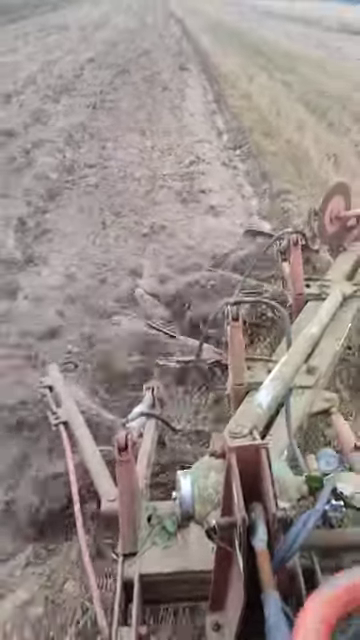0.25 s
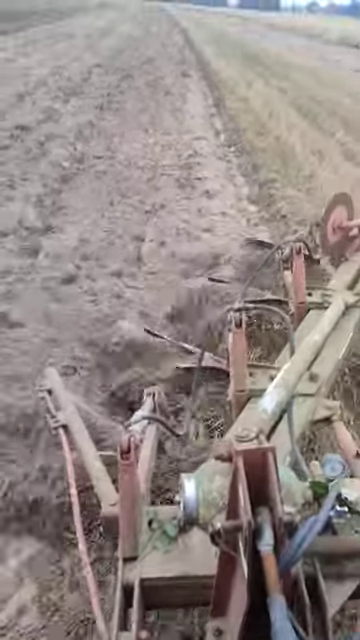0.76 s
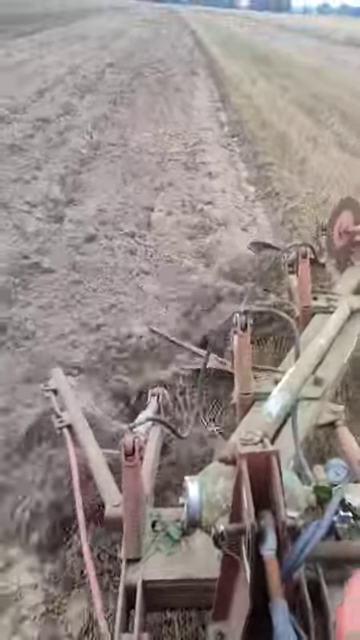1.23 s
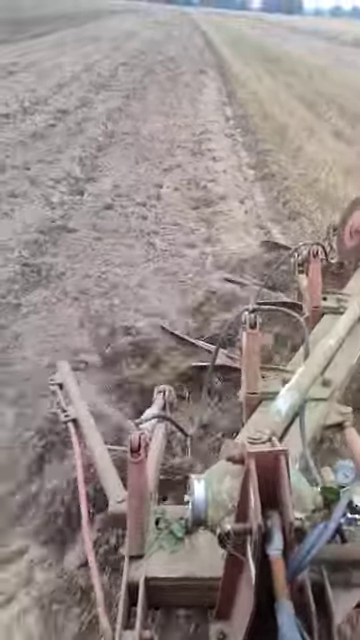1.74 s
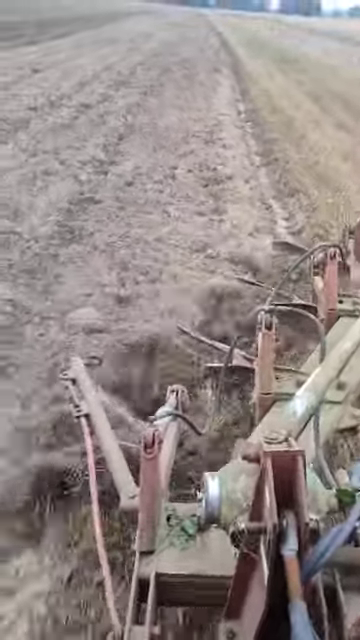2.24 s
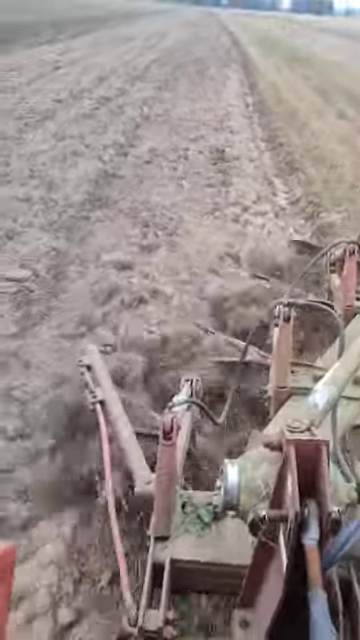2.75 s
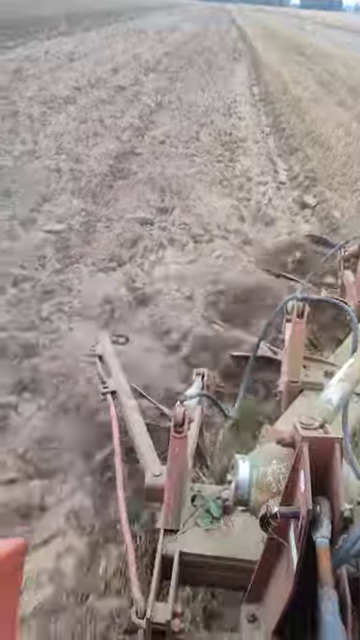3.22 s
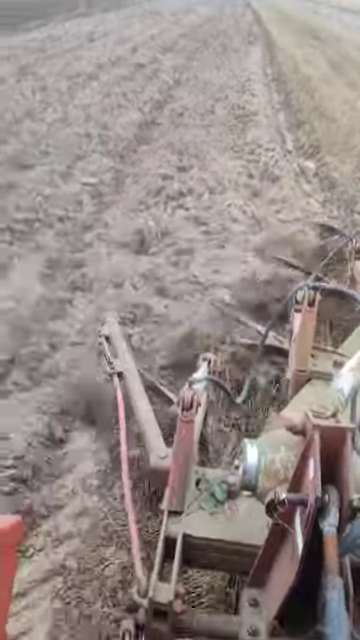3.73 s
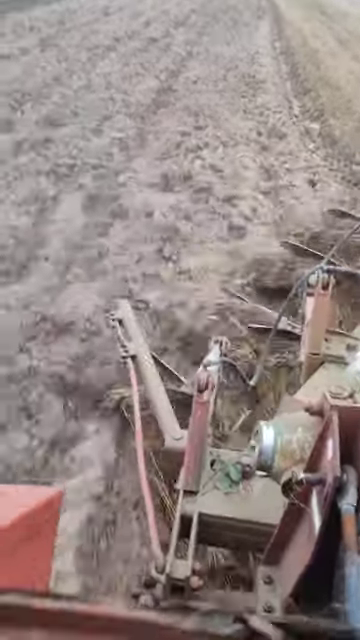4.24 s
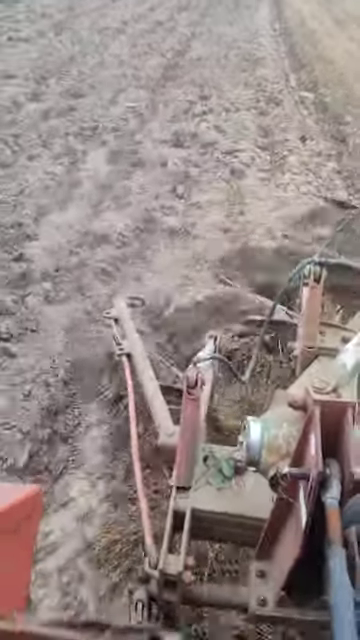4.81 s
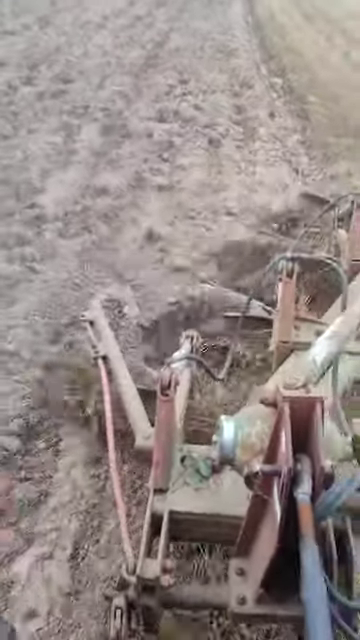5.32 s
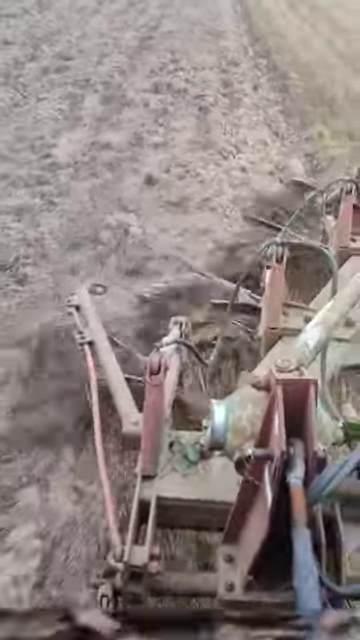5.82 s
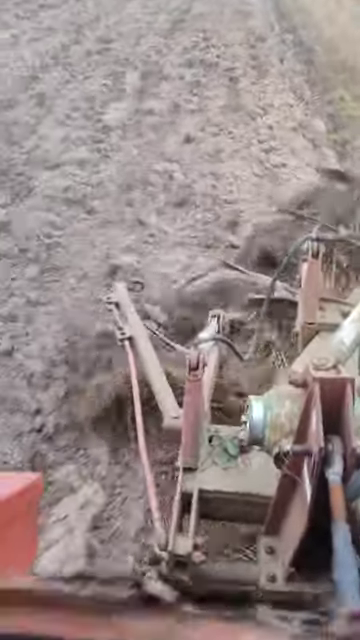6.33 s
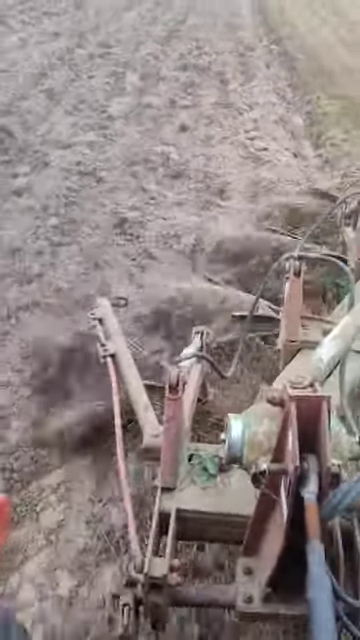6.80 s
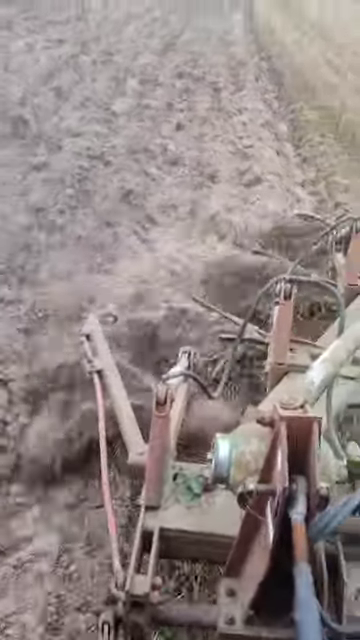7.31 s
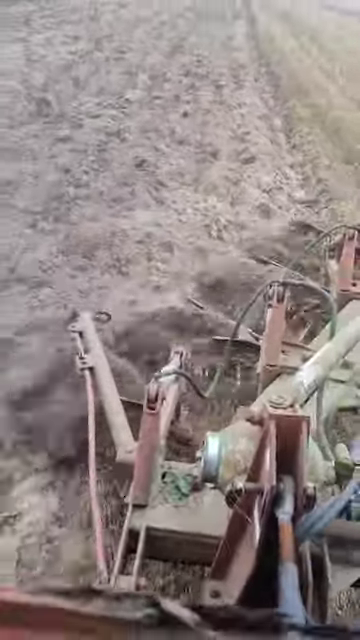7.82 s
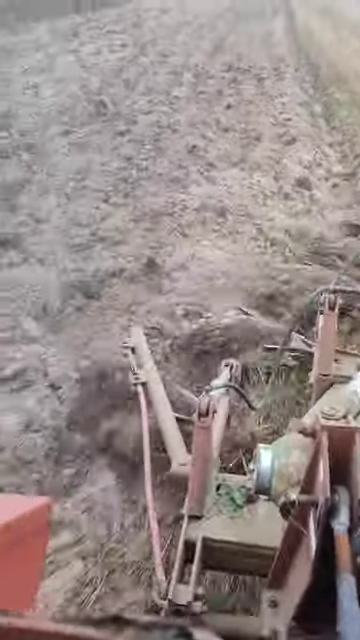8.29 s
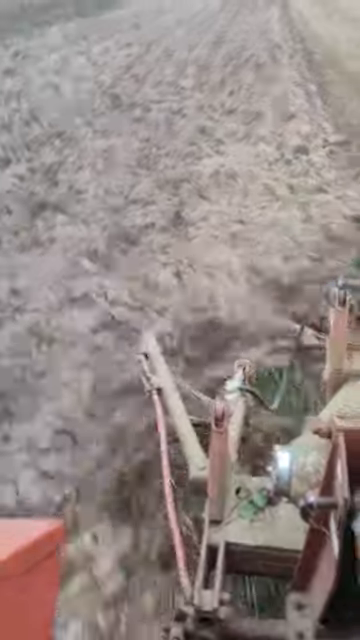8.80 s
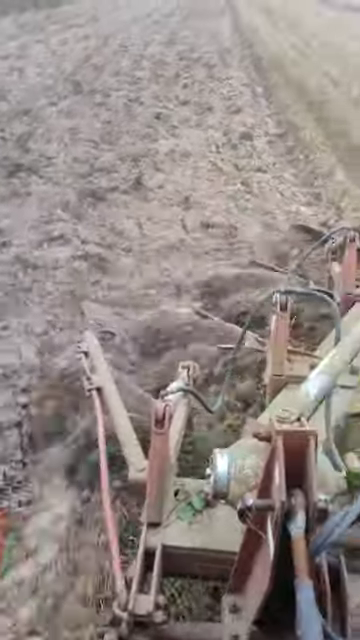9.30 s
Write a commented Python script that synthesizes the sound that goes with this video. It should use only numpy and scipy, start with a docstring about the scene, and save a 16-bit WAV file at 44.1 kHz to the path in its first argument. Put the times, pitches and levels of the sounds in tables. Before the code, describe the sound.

Heavy, continuous tractor engine growl and whirring gears, heard at the open cab rear, over rushing torn soil, crackling crumbs and ticking stones.

```python
"""A diesel drone with a swelling cab boom comes first: a six-cylinder tractor pulls a harrow through dry soil.
Heard from the open back of the cab; fan, gear pump, gears and shafts are drifting sines locked to the crank.
Valve clatter is a repeated noise pattern; low rumbles, the roar of soil and engine, and spray are shaped noise.
Crumbs are damped rings, and grit ticks on steel as short band-limited scrapes.
An automatic gain control ducks everything when the boom swells."""
import sys
import numpy as np
from scipy import signal
from scipy.fft import rfft, irfft, next_fast_len
from scipy.io import wavfile
from scipy.ndimage import uniform_filter1d

SR = 44100
rng = np.random.default_rng(int(sys.argv[2]) if len(sys.argv) > 2 else 0)


def generate_wav(sig):
    """Save sig (samples, or channels by samples) to the path in sys.argv[1] as 16-bit PCM at SR."""
    pcm = np.round(np.clip(np.atleast_2d(sig).T, -1, 1) * 32767).astype(np.int16)
    wavfile.write(sys.argv[1], SR, pcm)


N = 421155


def amp(db):
    """Amplitude ratio of a level in dB."""
    return 10 ** (np.asarray(db) / 20)


def unit(x):
    """Scale to rms 1."""
    return x / np.sqrt(np.mean(x ** 2) + 1e-20)


def along(points, hz):
    """Interpolate (Hz, value) points on a log-frequency axis."""
    point_hz, value = np.transpose(points)
    return np.interp(np.log(hz + 1), np.log(point_hz + 1), value)


def curves(rows):
    """One value per sample for each column after the time in s."""
    time_s, *columns = np.transpose(rows)
    return [np.interp(np.arange(N) / SR, time_s, column) for column in columns]


def wobble(rate_hz):
    """Random curve through rate_hz normal-distributed knots a second."""
    knots = rng.standard_normal(int(N * rate_hz / SR) + 2)
    return np.interp(np.arange(N) * rate_hz / SR, np.arange(len(knots)), knots)


def filtered(x, response):
    """Apply a complex response of frequency to x."""
    padded = next_fast_len(N + SR // 2)
    spectrum = rfft(x, padded) * response(np.fft.rfftfreq(padded, 1 / SR))
    return irfft(spectrum, padded)[..., :N]


def panned(lean_db):
    """Left and right gains for a left-minus-right level."""
    return amp(np.multiply.outer([.5, -.5], lean_db))


def tone(angle, db, lean_db, flutter_db, wander_rad):
    """A sine of rms db whose level and phase drift at random."""
    level = amp(db + flutter_db * (wobble(5) + .4 * wobble(16)))
    wave = level * np.sqrt(2) * np.cos(angle + wander_rad * wobble(4))
    return panned(lean_db)[:, None] * wave


# engine speed, creeping up as the soil eases: time_s, firing_hz
SPEED = [(0, 121.8), (.45, 121.4), (.7, 121.85), (.92, 120.65), (1.25, 120.75), (1.5, 121.1), (1.9, 120.7),
         (2.15, 121.0), (2.4, 121.3), (3.3, 122.9), (3.55, 122.95), (4.05, 124.2), (4.4, 123.3),
         (5.0, 123.2), (5.27, 122.6), (5.5, 123.35), (5.9, 123.6), (6.3, 123.45), (6.55, 124.05),
         (6.75, 124.1), (6.95, 124.7), (7.3, 124.3), (7.7, 124.6), (7.95, 124.15), (8.2, 124.7),
         (8.7, 124.55), (8.95, 124.2), (9.15, 124.6), (9.4, 124.0), (9.55, 124.15)]


def crank():
    """Firing rate and four-stroke cycle angle; six firings a cycle."""
    firing_hz = curves(SPEED)[0]
    return firing_hz, 2 * np.pi * np.cumsum(firing_hz) / (6 * SR)


# crank-turn boom level: time_s, level_db
BOOM_LEVEL = [(0, -35), (.25, -36.5), (.4, -24.5), (.9, -38), (1.4, -29), (1.85, -24.5), (2.38, -35),
              (2.55, -14.5), (2.95, -32), (3.2, -22.5), (4.0, -22.5), (4.27, -12), (4.42, -30.5),
              (4.65, -19), (4.8, -20.5), (5.28, -23.5), (5.55, -30.5), (5.8, -21), (6.55, -23),
              (6.93, -17.5), (7.16, -22.5), (7.4, -22.5), (7.6, -27.5), (8.05, -20), (8.4, -25.5),
              (8.78, -14.5), (9.05, -24.5), (9.3, -18), (9.55, -29.5)]


def boom(cycle):
    """The cab booms at the crank rate, two turns a cycle."""
    return tone(2 * cycle - 1, curves(BOOM_LEVEL)[0], -2.5, flutter_db=1.6, wander_rad=0.39)


# engine orders: cycle_multiple (rounded in use), slow_db, middle_db, fast_db, lean_db (left minus right)
ORDERS = [(3, -29, -28, -29, -2), (6, -22, -23, -22.5, -1), (7, -31.5, -29.5, -29, -3.5),
          (9, -31.5, -28.5, -29, -4), (11, -45.5, -46.5, -48.5, -0.5), (12, -30, -30, -31.5, -5.5),
          (14, -39, -31, -35.5, -5), (16, -34, -32.5, -32, 1.5), (17, -31, -36.5, -32.5, -7),
          (18, -41, -36.5, -38, -4.5), (19, -38, -35, -50, -6.5), (20, -38, -39.5, -41.5, -5.5),
          (21, -38.5, -41.5, -39.5, 2.5), (22, -39, -39.5, -38, -2), (24, -41, -38.5, -36, -7.5),
          (26, -38.5, -37, -55.5, -4.5), (32, -41, -38.5, -47, -10), (35, -53, -37, -47.5, 0.5),
          (36, -47.5, -45.5, -43, -4), (40, -52, -44, -44.5, -1), (44, -40, -44, -43, -2),
          (45, -44.5, -51.5, -44, -3.5), (46, -44.5, -61.5, -52, 0.5), (48, -40.5, -41.5, -42, -8),
          (51, -39.5, -42.5, -45, -1.5), (55, -55, -43.5, -47, -7.5), (57, -43.5, -51.5, -42.5, -9),
          (60, -45, -52.5, -50.5, -1.5), (61, -43, -50.5, -49.5, -5), (68.2, -38.5, -54, -46.5, -8.5),
          (78.2, -49, -50.5, -49.5, 2)]
# firing_hz at slow, middle, fast
SPEEDS_HZ = [121.2, 123.3, 124.6]


def engine_orders(firing_hz, cycle):
    """Multiples of the cycle; cab resonances favour different ones as the speed moves."""
    out = np.zeros((2, N))
    for multiple, slow_db, middle_db, fast_db, lean_db in ORDERS:
        multiple = round(multiple)
        start_rad = rng.uniform(0, 2 * np.pi)
        loose = min(0.25 + multiple / 40, 1)  # high multiples are less steady
        if multiple in (3, 6, 9):
            start_rad = 0  # exhaust puffs keep step
            loose *= 0.41  # and are steadier than their neighbours
        db = np.interp(firing_hz, SPEEDS_HZ, [slow_db, middle_db, fast_db])
        out += tone(multiple * cycle + start_rad, db, lean_db, flutter_db=2.4 * loose, wander_rad=0.76 * loose)
    return out


# swelling orders: cycle_multiple, lean_db (left minus right)
SWELLING_ORDERS = [(10, -5), (25, 0.5), (39, 0.5)]
# their levels: time_s, then level_db of each order
SWELL_LEVELS = [(0, -31.5, -38.5, -44), (.75, -34, -34, -47), (1.5, -29.5, -36, -40),
                (2.5, -27.5, -39, -41.5), (3.25, -29, -36.5, -48), (3.75, -28, -39, -46.5),
                (4.25, -34.5, -38, -43), (4.9, -31.5, -34.5, -46), (5.7, -34.5, -33.5, -40),
                (6.3, -35, -36, -41), (7.3, -38.5, -31.5, -40), (7.9, -36, -32, -40.5),
                (8.3, -36, -39.5, -41.5), (9.55, -30, -35, -39.5)]


def swelling_orders(cycle):
    """A few engine orders swell and fade slowly."""
    out = np.zeros((2, N))
    for (multiple, lean_db), db in zip(SWELLING_ORDERS, curves(SWELL_LEVELS)):
        out += tone(round(multiple) * cycle, db, lean_db, flutter_db=2.3, wander_rad=0.6)
    return out


FAN_PER_CYCLE = 7.3
# fan blade level: time_s, level_db
FAN_LEVEL = [(0, -33), (.75, -36.5), (1.5, -29), (2.5, -25.5), (3.25, -26.5), (4, -27.5), (4.75, -26),
             (5.5, -29), (6.6, -30.5), (7.2, -24), (7.8, -24), (8.5, -25.5), (9.55, -32.5)]


def fan(cycle):
    """Blade tone geared to the crank; belt slip lets its phase wander."""
    return tone(FAN_PER_CYCLE * cycle, curves(FAN_LEVEL)[0], -2.3, flutter_db=3.5, wander_rad=1.76)


PUMP_PER_CYCLE = 29.44
PUMP_THIRD_DB, PUMP_FOURTH_DB = -48, -54
SQUEAL_S, SQUEAL_WIDTH_S, SQUEAL_RISE_DB = 3.65, 0.09, 14.5
# first harmonic: level_db at slow, middle, fast
PUMP_FIRST_DB = [-35, -41, -39.5]
# second harmonic, singing and dropping out: time_s, level_db
PUMP_SECOND = [(0, -37), (.3, -40), (1.2, -38.5), (1.5, -43.5), (2.0, -40.5), (2.3, -39), (2.7, -36.5),
               (3.0, -32), (3.5, -32), (4.1, -34.5), (4.4, -44.5), (4.9, -36), (5.05, -42), (5.27, -35),
               (5.9, -35.5), (6.0, -44), (6.2, -31), (6.4, -44.5), (6.6, -30.5), (6.85, -39.5), (7.1, -46),
               (7.55, -43), (7.72, -32), (7.9, -40), (8.2, -33), (8.4, -49.5), (8.6, -43.5), (8.75, -33),
               (9.0, -36.5), (9.22, -30.5), (9.55, -44)]


def gear_pump(firing_hz, cycle):
    """Tooth-mesh tone with four harmonics; the fourth flares once."""
    angle = PUMP_PER_CYCLE * cycle + .35 * wobble(4) + .3 * wobble(11)
    first_db = np.interp(firing_hz, SPEEDS_HZ, PUMP_FIRST_DB)
    flare = np.exp(-((np.arange(N) / SR - SQUEAL_S) / SQUEAL_WIDTH_S) ** 2)
    fourth_db = PUMP_FOURTH_DB + SQUEAL_RISE_DB * flare
    out = tone(angle, first_db, -10.0, flutter_db=1.0, wander_rad=0)
    out += tone(2 * angle, curves(PUMP_SECOND)[0], -0.93, flutter_db=1.8, wander_rad=.5)
    out += tone(3 * angle, PUMP_THIRD_DB, -8, flutter_db=4, wander_rad=0)
    out += tone(4 * angle, fourth_db, -2, flutter_db=3.0, wander_rad=.8)
    return out


GEAR_PER_CYCLE = 33
# timing gear level, second harmonic: time_s, level_db
GEAR_LEVEL = [(0, -48), (2, -50.5), (2.8, -43), (3.3, -40), (3.8, -35.5), (4.2, -40.5), (4.7, -39),
              (5.6, -41), (6.3, -45.5), (7.2, -47), (7.8, -42.5), (8.3, -47.5), (9.55, -42.5)]


def timing_gear(cycle):
    """Harmonics two to four of the gear mesh."""
    gear_db = curves(GEAR_LEVEL)[0]
    out = np.zeros((2, N))
    for harmonic, offset_db, lean_db in [(2, 0, -8), (3, -12, 2), (4, -12, -1)]:
        angle = harmonic * GEAR_PER_CYCLE * cycle
        out += tone(angle, gear_db + offset_db, lean_db, flutter_db=5.0, wander_rad=1.1)
    return out


# geared parts: cycle_multiple
SHAFT_MULTIPLES = [2.415, 17.5, 42.3, 49.5]
# one row per part: level_db, lean_db (left minus right)
SHAFT_LEVELS = [(-31.5, -1), (-42, -10.5), (-43, -6), (-45, -2.5)]


def shafts(cycle):
    """Other geared parts, one tone each, at fixed ratios to the cycle."""
    out = np.zeros((2, N))
    for multiple, (db, lean_db) in zip(SHAFT_MULTIPLES, SHAFT_LEVELS):
        angle = multiple * cycle + rng.uniform(0, 2 * np.pi)
        out += tone(angle, db, lean_db, flutter_db=0.5, wander_rad=1.2)
    return out


def engine():
    """All tonal parts, driven by one crank."""
    firing_hz, cycle = crank()
    out = boom(cycle) + engine_orders(firing_hz, cycle) + swelling_orders(cycle)
    return out + fan(cycle) + gear_pump(firing_hz, cycle) + timing_gear(cycle) + shafts(cycle)


# spectrum of the remaining cycle multiples: freq_hz, level_db
CLATTER_SPECTRUM = [(80, -41.5), (300, -41.5), (600, -46.5), (1000, -50.5), (1400, -49), (1700, -53.5),
                    (2100, -62), (2800, -55.5), (3500, -65.5), (4200, -105)]


def clatter(count=15, size=4096):
    """Valves and injectors repeat a knocking pattern each cycle; it slowly turns into the next."""
    multiple = np.arange(size // 2 + 1)
    taken = [0, 1, 2, 10, 25, 39, 2 * GEAR_PER_CYCLE, round(2 * PUMP_PER_CYCLE)]
    taken += [round(row[0]) for row in ORDERS]
    level = amp(along(CLATTER_SPECTRUM, multiple * SPEEDS_HZ[1] / 6)) * ~np.isin(multiple, taken)
    shape = (3, count, len(multiple))
    draw = rng.standard_normal(shape) + 1j * rng.standard_normal(shape)
    own = 0.7  # power share that differs between left and right
    mixed = np.sqrt(1 - own) * draw[0] + np.sqrt(own) * draw[1:]
    patterns = irfft(level * mixed, size) * size / 2
    place = np.arange(N) / N * (count - 1.001)
    first, turn = place.astype(int), place % 1 * np.pi / 2  # equal-power crossfade
    cycle_part = (crank()[1] + 0.0082 * wobble(9)) / (2 * np.pi) % 1
    spot = (cycle_part * size).astype(int) % size
    old, new = patterns[:, first, spot], patterns[:, first + 1, spot]
    return panned(-6.0)[:, None] * (np.cos(turn) * old + np.sin(turn) * new)


# left-right likeness: freq_hz, correlation
LIKENESS = [(60, 1), (250, 0.82), (500, 0.75), (1000, 0.11), (2000, 0.088), (7000, .05)]
# left-right balance: freq_hz, lean_db (left minus right)
BALANCE = [(60, -2.5), (100, -3.5), (170, -7), (300, -2.5), (500, -4.5), (860, 1.5), (1460, -5),
           (2480, 1.5), (4220, -0.5), (7180, 8)]


def rush(spectrum, patchy_db):
    """Shaped stereo noise of rms 1 with time-frequency patches of random gain."""
    bins = signal.stft(rng.standard_normal((2, N)), nperseg=512)[2]
    field = uniform_filter1d(rng.standard_normal(bins.shape[1:]), size=12, axis=0)
    field = uniform_filter1d(field, size=10, axis=1)
    pair = signal.istft(bins * amp(patchy_db * unit(field)), nperseg=512)[1][:, :N]

    def mid_side(hz):
        turn = np.arccos(np.clip(along(LIKENESS, hz), -1, 1)) / 2
        return amp(along(spectrum, hz)) * [np.cos(turn), np.sin(turn)]

    mid, side = filtered(pair, mid_side)
    return unit(filtered(np.array([mid + side, mid - side]), lambda hz: panned(along(BALANCE, hz))))


# spectrum shape: freq_hz, relative_db (per Hz)
LOW_WIND_SPECTRUM = [(5, -53), (11, -20.5), (18, 6), (28, 20.5), (40, -5.5), (60, -55)]


def low_wind_rumble():
    """Low wind-like rumble around 28 Hz, its level drifting slightly at random."""
    return amp(-35 + 0.5 * wobble(5)) * rush(LOW_WIND_SPECTRUM, patchy_db=0.5)


# spectrum shape: freq_hz, relative_db (per Hz)
RUMBLE_SPECTRUM = [(8, -39.5), (20, -14.5), (45, -2), (70, -2.5), (100, -13.5), (135, -6.5), (200, -7),
                   (300, -9.5), (450, -13), (600, -12.5), (800, -19.5), (1200, -72.5)]
# chassis rumble level: time_s, level_db
RUMBLE_LEVEL = [(0, -21.5), (1.5, -22.5), (2.5, -21.5), (3.5, -22.5), (5, -22.5), (6.5, -22), (8, -21.5),
                (9.55, -22)]


def chassis_rumble():
    """Low shaped noise of the shuddering chassis."""
    return amp(curves(RUMBLE_LEVEL)[0] + 0.39 * wobble(4.0)) * rush(RUMBLE_SPECTRUM, patchy_db=1.06)


ROAR_OVER_SOIL_DB = 7.5
PUFF_DEPTH, CYCLE_DEPTH = .083, .08  # amplitude beating at 3 and 1 per cycle
# spectrum shape: freq_hz, relative_db (per Hz)
ROAR_SPECTRUM = [(350, -34), (600, -3.5), (819, -9), (998, -5.5), (1090, -8), (1200, -4), (1290, -7),
                 (1550, -8), (1670, -13), (1810, -11.5), (2000, -16.5), (2180, -17), (2400, -13.5),
                 (2550, -15.5), (2750, -13.5), (3250, -15), (4220, -53), (7150, -120)]


def soil_and_engine_roar(soil_db, clods):
    """Tearing soil mixed with engine roar, which beats at the puff and cycle rates."""
    cycle = crank()[1]
    throb = 1 + PUFF_DEPTH * np.cos(3 * cycle) + CYCLE_DEPTH * np.cos(cycle)
    level = amp(ROAR_OVER_SOIL_DB + soil_db + 0.31 * clods)
    return level * throb * rush(ROAR_SPECTRUM, patchy_db=1.0)


SPRAY_OVER_SOIL_DB, SPRAY_FOLLOWS = -3, .6  # share of the soil's dB swings taken up
# spectrum shape: freq_hz, relative_db (per Hz)
SPRAY_SPECTRUM = [(3000, -28.5), (3500, 1.5), (4300, -1.5), (5600, -1.5), (6600, -10), (7100, -16.5),
                  (7650, -28)]


def spraying(soil_db, clods):
    """Fine soil sprays off the tines: high hiss that partly follows the soil level."""
    mean_db = soil_db.mean()
    spray_db = SPRAY_OVER_SOIL_DB + mean_db + SPRAY_FOLLOWS * (soil_db - mean_db)
    return amp(spray_db + 0.57 * clods + 0.18 * wobble(20)) * rush(SPRAY_SPECTRUM, patchy_db=0.8)


CRUMBS_PER_S, CRUMB_OVER_SOIL_DB = 450, -9.5
CRUMB_HZ, CRUMB_SPREAD, CRUMB_CYCLES = 2700, .11, 6.7  # median, log-pitch deviation, cycles to 1/e


def crumbs(size=400):
    """Clods crack on the tines in clumps: damped rings around one pitch, each with its own pan; rms 1."""
    when, size_draw, angle_draw, loud_draw, pan = rng.random((5, int(CRUMBS_PER_S * N / SR), 1))
    surge = np.cumsum(amp(5 * wobble(6)))
    at = np.searchsorted(surge, when * surge[-1])
    normal = np.sqrt(-2 * np.log(size_draw + 1e-9)) * np.cos(2 * np.pi * angle_draw)
    hz = CRUMB_HZ * np.exp(CRUMB_SPREAD * normal)
    t = np.arange(size) / SR
    ring = np.sin(2 * np.pi * hz * t) * np.exp(-t * hz / CRUMB_CYCLES)
    ring *= amp(-3 * np.log(loud_draw + 1e-3))
    spots = (at + np.arange(size)).ravel()
    sides = [np.cos(np.pi * pan), np.sin(np.pi * pan)]
    return unit(np.array([np.bincount(spots, (side * ring).ravel(), N + size)[:N] for side in sides]))


# soil hiss reference level: time_s, level_db
SOIL_LEVEL = [(0.05, -32.5), (0.13, -31.5), (0.6, -33.5), (1.57, -32.5), (2.54, -33), (2.61, -34),
              (3.01, -34), (3.11, -31), (3.14, -36.5), (3.29, -30.5), (3.32, -36.5), (3.53, -33),
              (4.11, -33.5), (4.29, -34.5), (4.37, -33), (4.97, -35.5), (5.05, -31.5), (5.08, -34.5),
              (5.23, -31), (5.34, -35.5), (5.44, -33), (5.49, -31), (5.55, -33.5), (5.63, -32.5),
              (5.99, -35), (6.18, -32.5), (6.86, -33), (6.96, -35), (7.3, -32.5), (7.33, -35),
              (7.62, -32.5), (7.85, -35), (8.11, -33), (8.61, -34.5), (8.64, -31.5), (8.72, -34),
              (9.45, -33)]


def ground():
    """Low rumbles, plus roar, spray and crumbs that share the soil level."""
    soil_db = curves(SOIL_LEVEL)[0]
    clods = wobble(6) + wobble(14) + wobble(26) / 2
    out = low_wind_rumble() + chassis_rumble()
    out += soil_and_engine_roar(soil_db, clods) + spraying(soil_db, clods)
    return out + amp(CRUMB_OVER_SOIL_DB + soil_db) * crumbs()


SMALL_COUNT, SMALL_SPREAD_DB = 120, 8
BAND_WIDTH, DULL_ABOVE_HZ = .42, 6900  # width in log pitch
TAIL_DB, TAIL_T60_S = -11, .035
# larger stones: start_s, level_db (burst rms is 9 dB lower), lean_db (left minus right), length_ms, pitch_hz
STONES = [(1.8640, -23, 1, 3.2, 5400), (3.9545, -23.5, 4, 1.2, 5940), (4.4348, -22.5, 5.5, 4.5, 5700),
          (4.5825, -26, 1.5, 5.5, 6420), (4.9831, -27.5, 3.5, 3.6, 5180), (5.0527, -17.5, 6, 5, 4800),
          (5.1578, -29.5, 3.5, 2.6, 6550), (5.2262, -23, 0.5, 1.5, 4840), (5.9085, -21.5, 5.5, 5.5, 5760),
          (6.1950, -33, 3, 8, 6470), (6.5270, -26, 4, 5.7, 6460), (8.3283, -26.5, 8.5, 7, 4830)]


def grit(size=4096):
    """Stones strike steel: a scrape of a few ms that stops short, then a faint tail; small ones between."""
    small = [(s * N / SR, -40 + SMALL_SPREAD_DB * e ** 2, 3 + 6 * (p - .5), 3, 4500 + 2000 * h)
             for s, e, p, h in rng.random((SMALL_COUNT, 4))]
    out = np.zeros((2, N + SR))
    t, f = np.arange(size) / SR, np.fft.rfftfreq(size, 1 / SR)
    for start_s, level_db, lean_db, length_ms, pitch_hz in list(STONES) + small:
        band = np.exp(-(np.log((f + 1) / pitch_hz) / BAND_WIDTH) ** 2) / (1 + (f / DULL_ABOVE_HZ) ** 12)
        scrape = unit(irfft(rfft(rng.standard_normal(size)) * band, size))
        over_s = t - length_ms / 1000
        attack = np.clip(t / 0.00054, 0, 1)
        stop = np.clip(1 - over_s / .0008, 0, 1)
        tail = amp(TAIL_DB - 60 * np.abs(over_s) / TAIL_T60_S)
        burst = attack * (stop + tail) * scrape
        burst = burst / np.sqrt(np.sum(burst ** 2) / (length_ms * SR / 1000))
        out[:, round(start_s * SR):][:, :size] += panned(lean_db)[:, None] * amp(level_db - 9) * burst
    return out[:, :N]


# left channel's phase lag: freq_hz, lag_rad
LEFT_LAG = [(200, 0), (330, .55), (500, 1.05), (650, 1.5), (1200, 1.45), (1600, 3.8), (2150, 5.8),
            (4300, 12), (7300, 16)]


def scene():
    """Engine and ground reach the right first; long waves fill the cab evenly; grit has no lag."""
    steady = engine() + clatter() + ground()
    turn = lambda hz: np.exp(np.multiply.outer([-.5j, .5j], along(LEFT_LAG, hz)))
    return filtered(steady, turn) + grit()


GAIN_LAG_S, CEILING, TOP_HZ = .04, 0.99, 7620


def record(dry):
    """Gain falls as smoothed power rises; peaks round off under a ceiling; cut above the band limit."""
    keep = np.exp(-1 / (GAIN_LAG_S * SR))
    power = np.mean(dry ** 2, axis=0)
    loud = signal.lfilter([1 - keep], [1, -keep], power, zi=[keep * power.mean()])[0]
    level = (loud / power.mean()) ** -.3 * dry
    rounded = level / (1 + np.abs(level / CEILING) ** 6) ** (1 / 6)
    return filtered(rounded, lambda hz: hz < TOP_HZ)


dry = scene()
out = record(dry)
generate_wav(out)
```